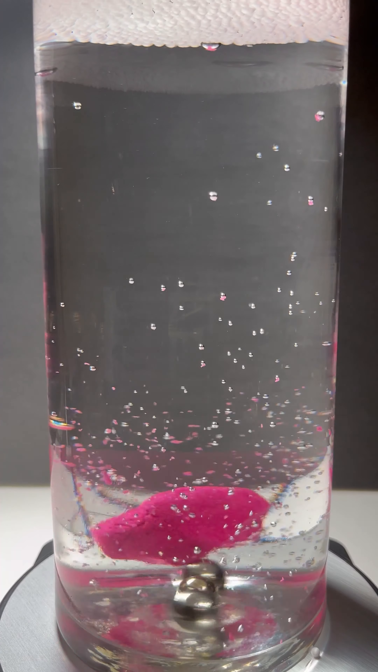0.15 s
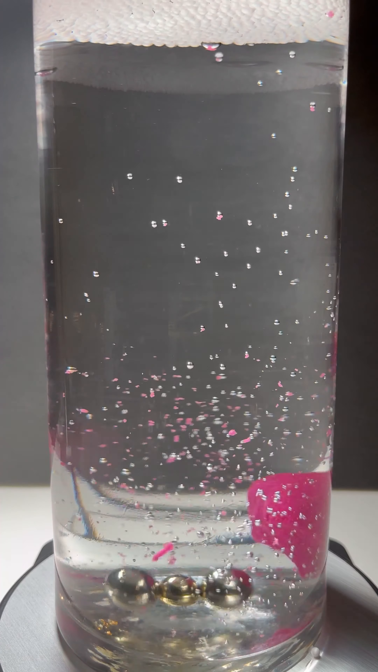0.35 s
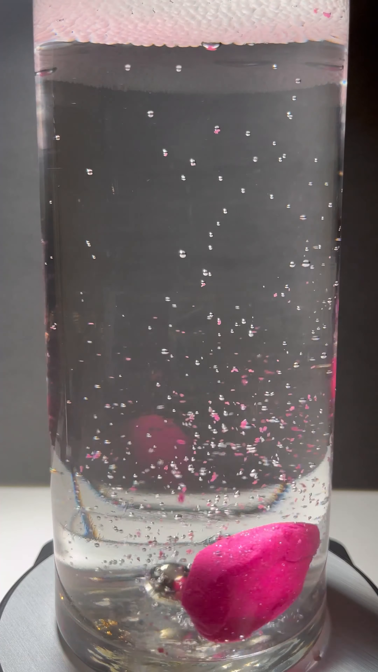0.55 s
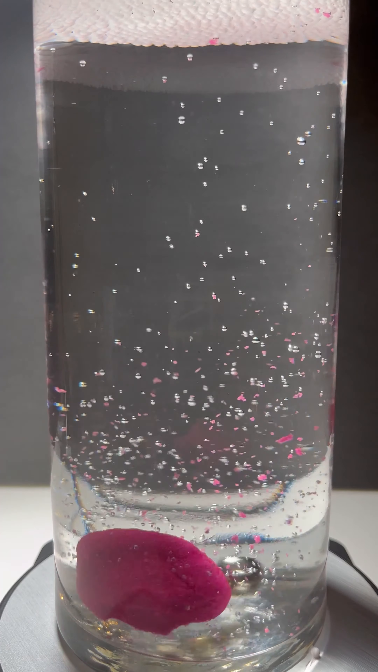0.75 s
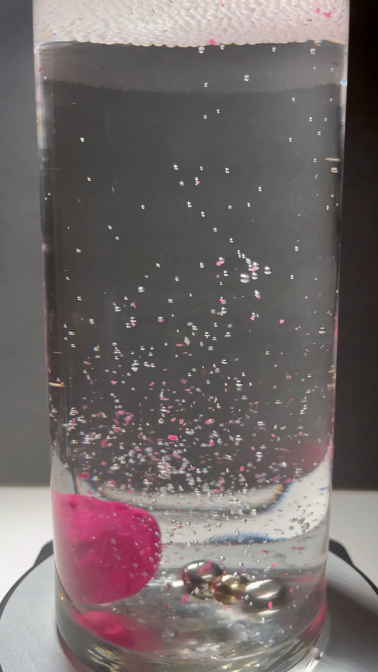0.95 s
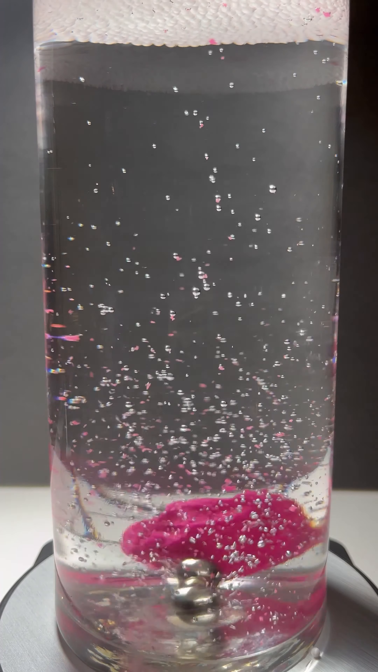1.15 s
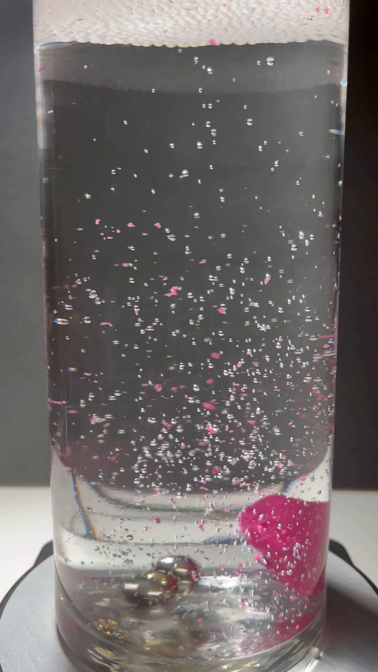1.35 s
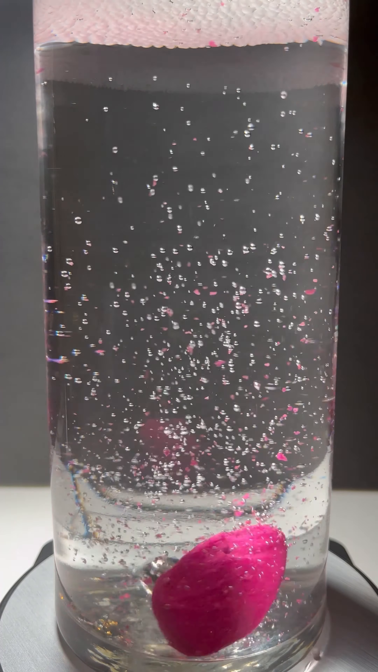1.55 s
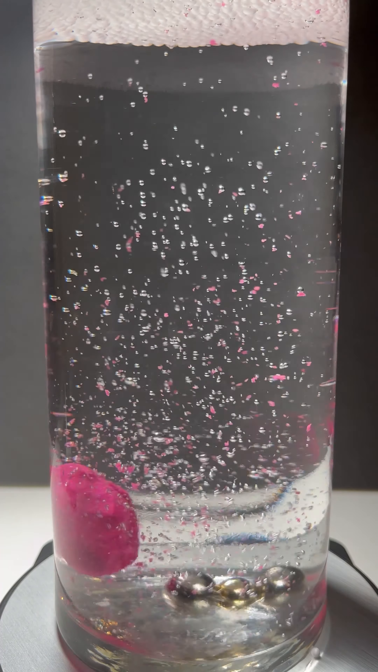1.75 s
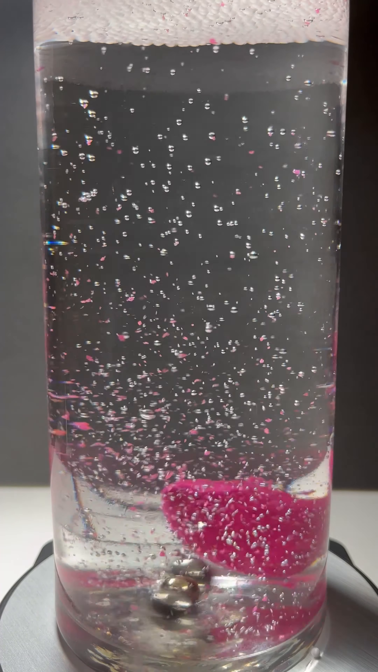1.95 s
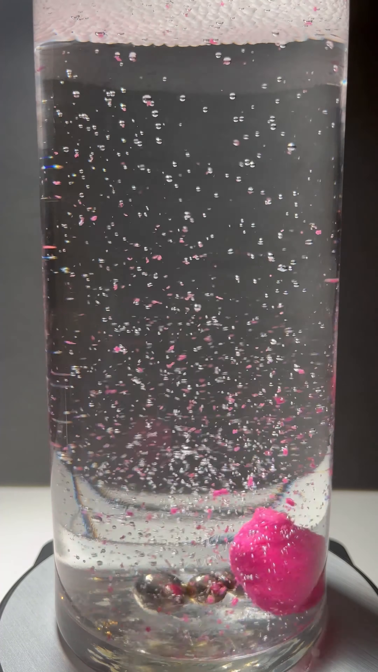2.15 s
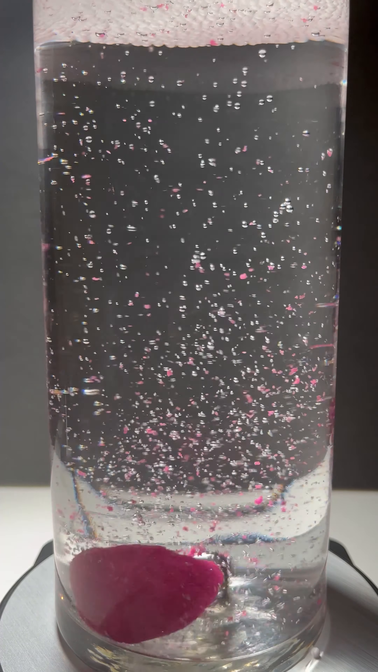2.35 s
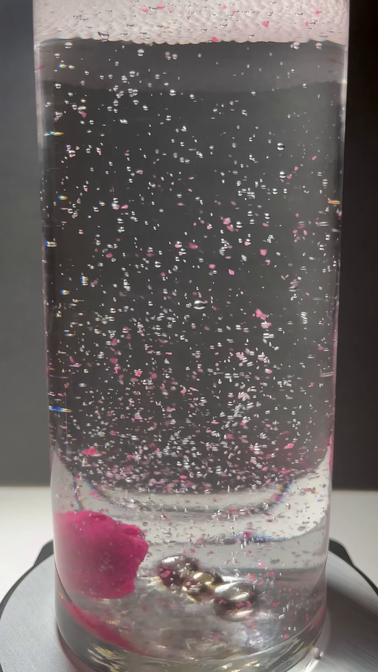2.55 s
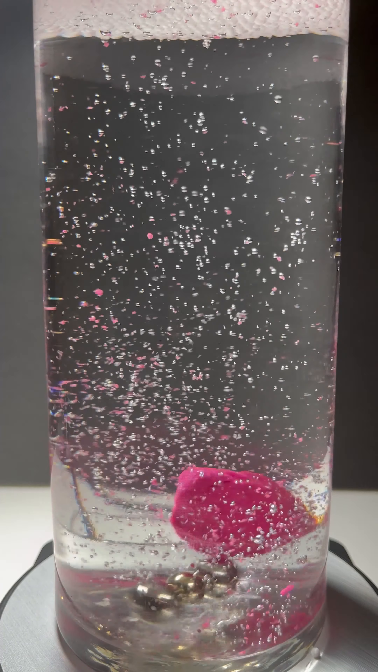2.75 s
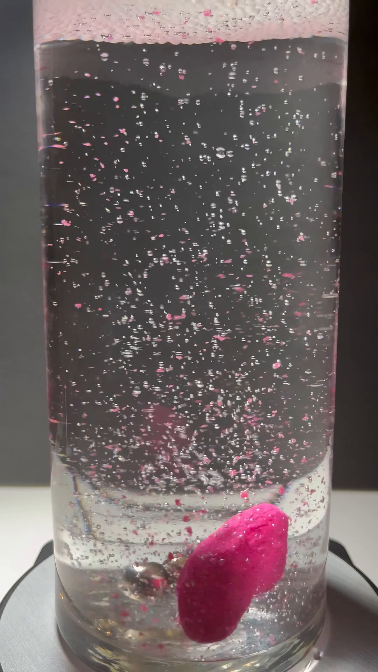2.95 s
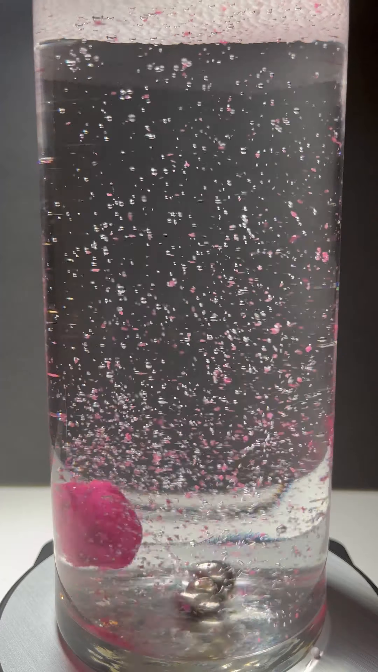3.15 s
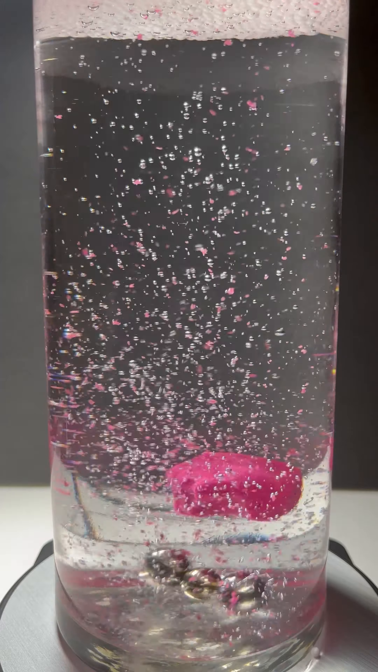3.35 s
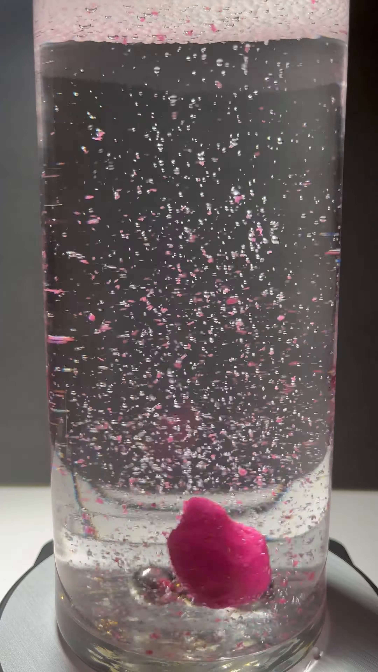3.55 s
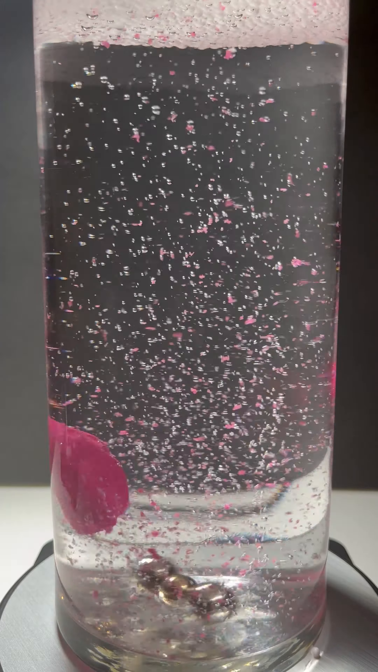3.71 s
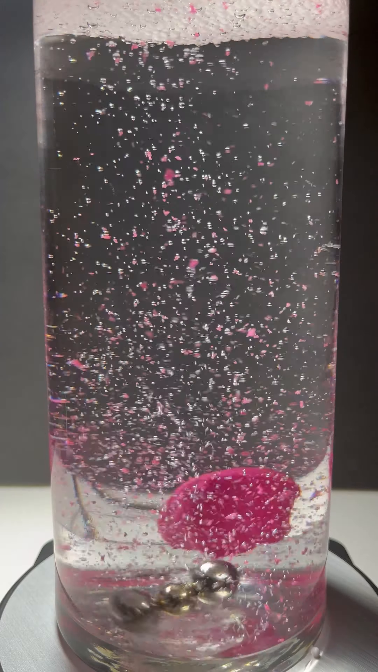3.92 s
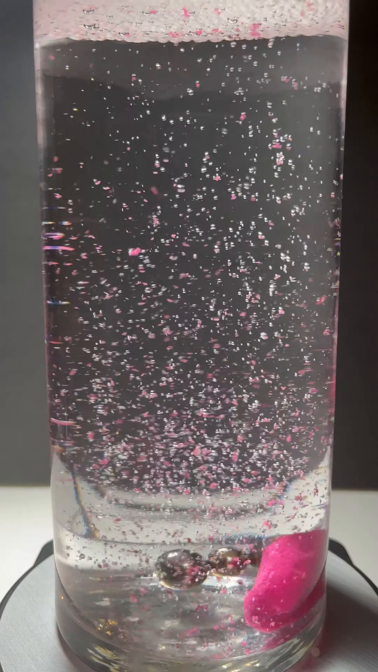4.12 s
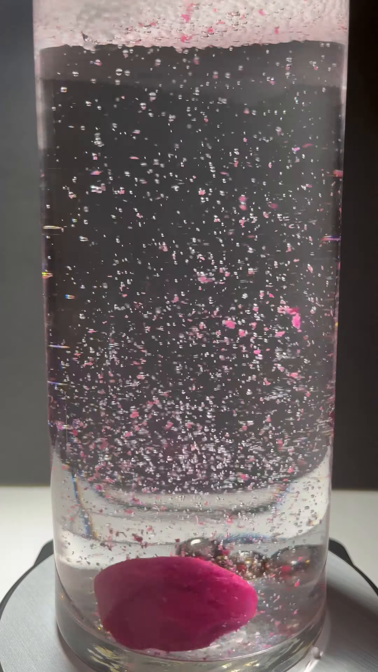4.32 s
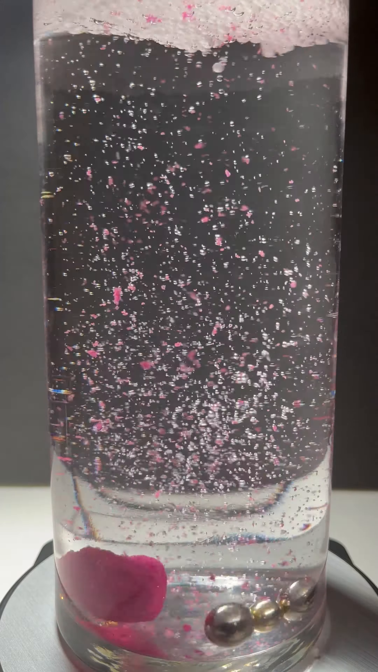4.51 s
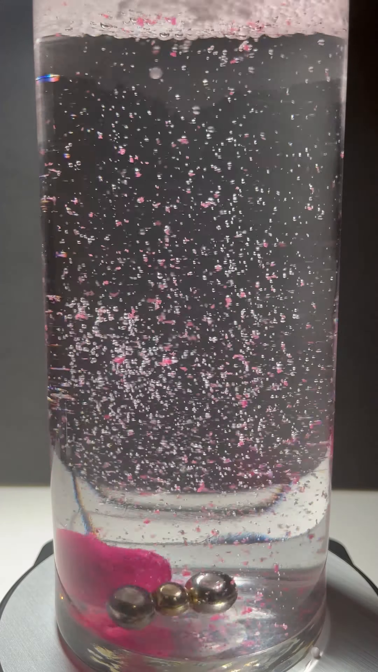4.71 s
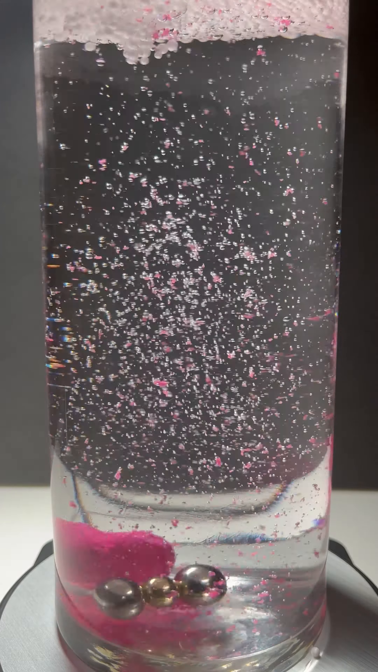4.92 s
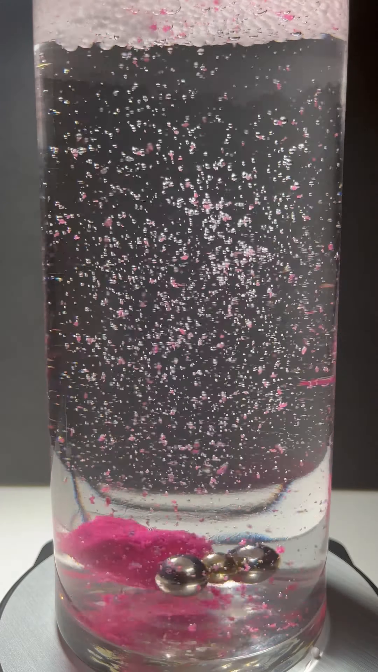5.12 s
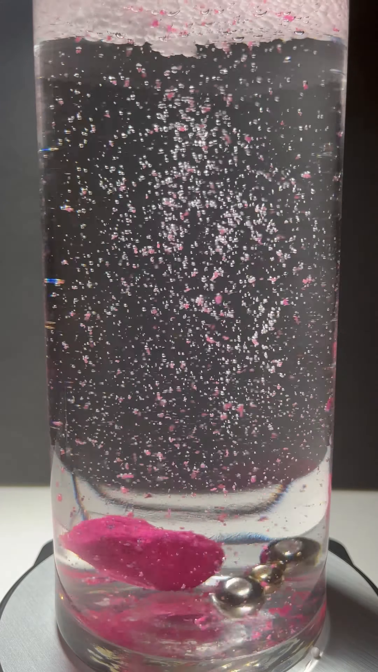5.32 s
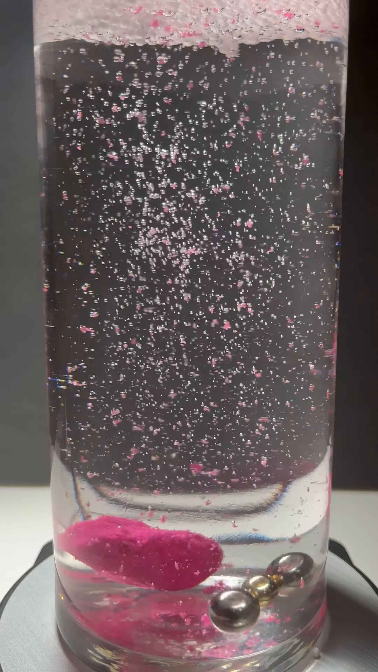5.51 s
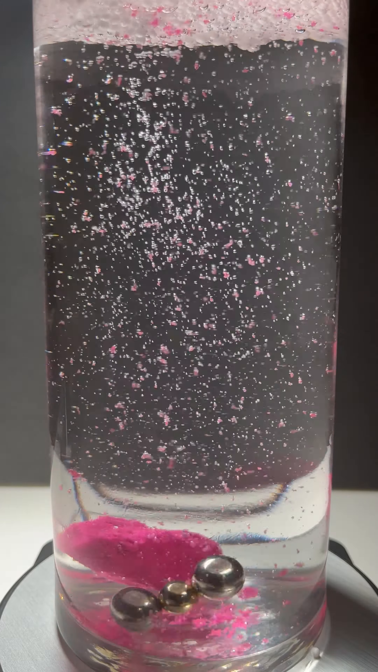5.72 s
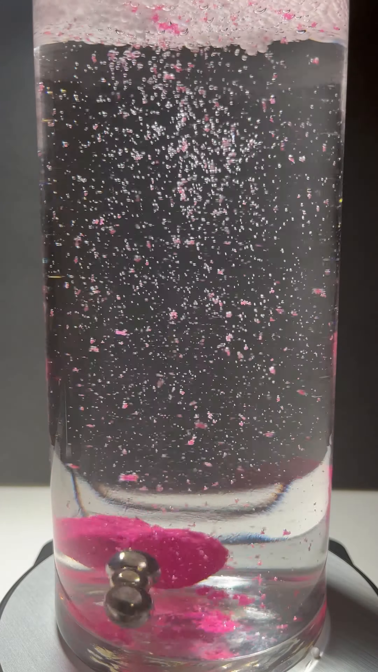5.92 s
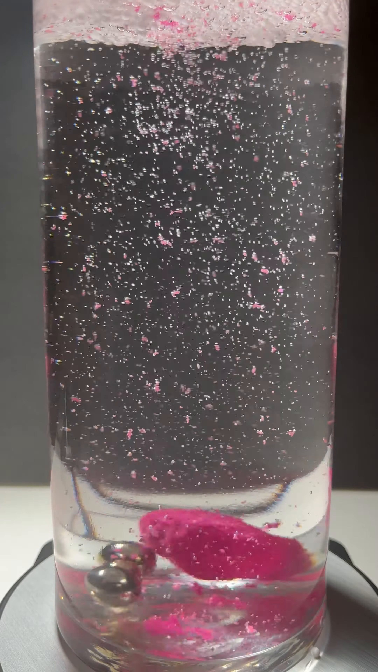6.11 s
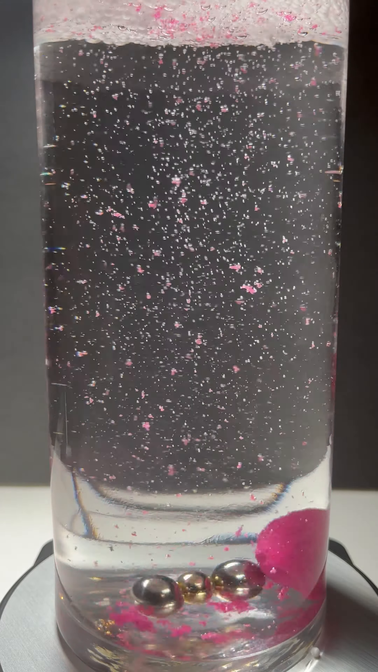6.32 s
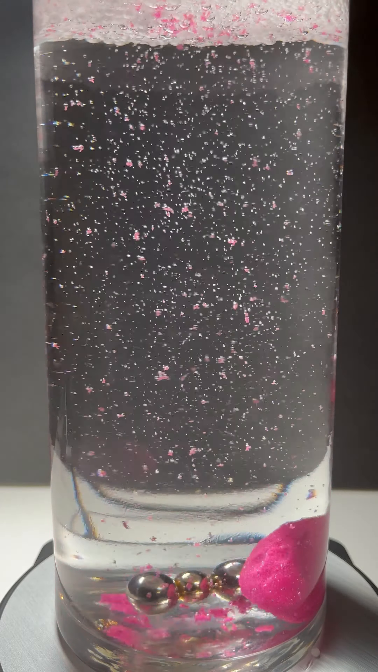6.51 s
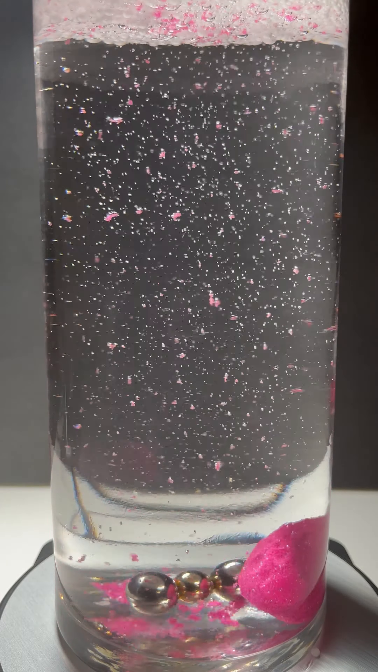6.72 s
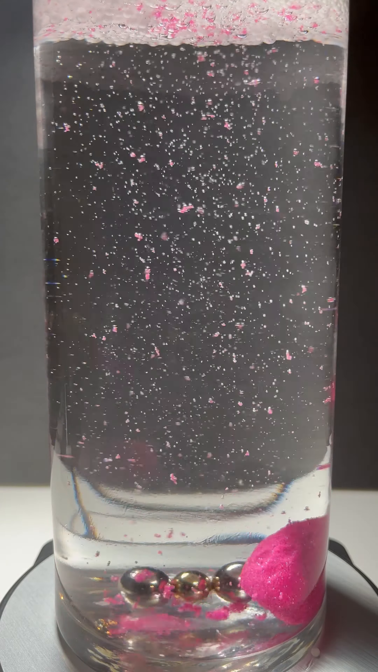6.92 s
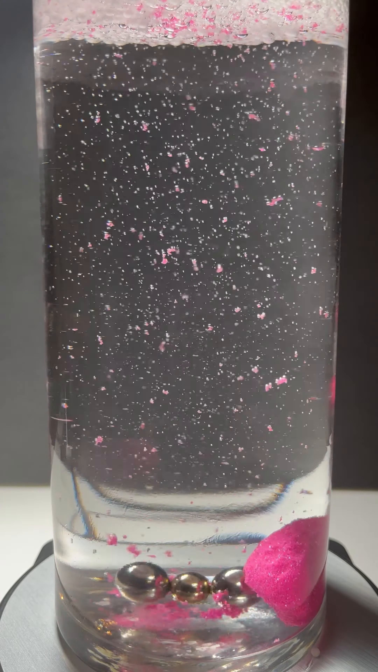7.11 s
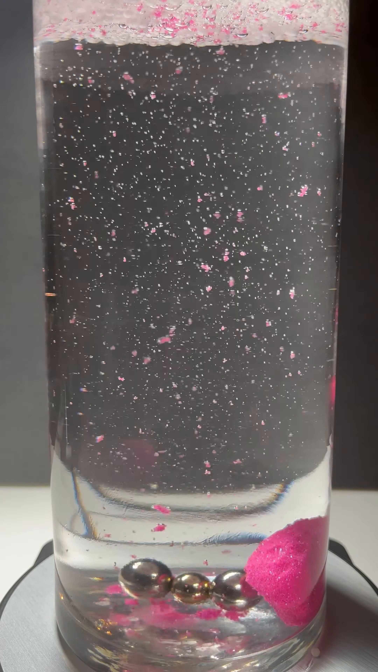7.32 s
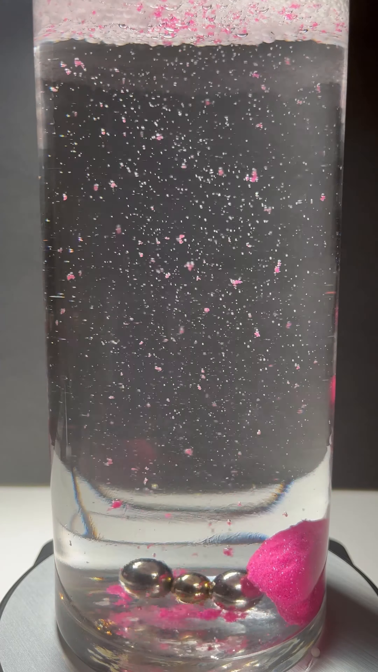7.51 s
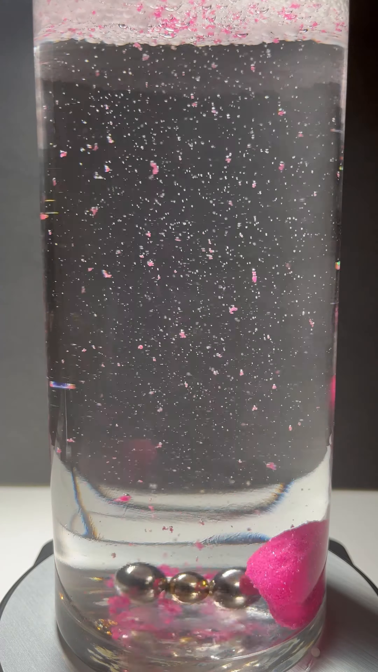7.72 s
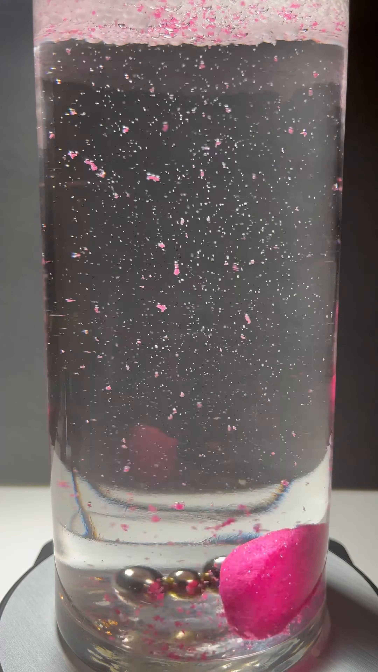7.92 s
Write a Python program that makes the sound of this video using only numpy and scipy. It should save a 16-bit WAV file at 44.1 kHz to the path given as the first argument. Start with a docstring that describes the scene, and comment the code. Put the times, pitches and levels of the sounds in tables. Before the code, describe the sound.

Busy metallic rattling on thick wet glass with dull soft knocks and low rumble, thinning into sharper wall clacks, a quiet humming pause, then a brief restart.

```python
"""A motor hums in a quiet room while it whirls a chain of steel balls round a water-filled glass cylinder.
From the start the balls roll (hails of tiny contacts), the stand rumbles (shaped noise), and hops and landings
click, clack and thud (noise bursts, ringing modes, damped tones); a soft lump knocks dully along with them.
Direct blows on the side wall join midway. After a last cluster of them the balls rest for over a second,
with soft scuffs and few faint taps over the hum, then set off again."""
import sys
import numpy as np
from scipy import signal
from scipy.fft import rfft, irfft, next_fast_len
from scipy.io import wavfile
from scipy.ndimage import uniform_filter1d, map_coordinates

SR = 44100
rng = np.random.default_rng(int(sys.argv[2]) if len(sys.argv) > 2 else 0)


def waveform_to_disk(signal):
    """Save audio, clipped to [-1, 1], as 16-bit WAV at the path in sys.argv[1]."""
    frames = np.transpose(np.atleast_2d(signal))
    scaled = np.clip(frames, -1, 1) * 32767
    samples = np.round(scaled).astype(np.int16)
    wavfile.write(sys.argv[1], SR, samples)


N = 355446
TIME = np.arange(N) / SR
FFT_SIZE = next_fast_len(N + SR // 2, True)
HZ = np.fft.rfftfreq(FFT_SIZE, 1 / SR)


def amp(db):
    """Amplitude factor of a level in dB."""
    return 10 ** (np.asarray(db) / 20)


def unit(x):
    """x scaled to an rms of 1."""
    return x / np.sqrt(np.mean(x ** 2) + 1e-20)


def along(points, hz):
    """Interpolates (freq_hz, value) points on a log frequency axis."""
    f, v = np.transpose(points)
    return np.interp(np.log(hz + 1), np.log(f + 1), v)


def wobble(rate_hz):
    """Smooth random curve through rate_hz random knots a second."""
    knots = rng.standard_normal(int(N * rate_hz / SR) + 4)
    coarse = np.arange(10 * len(knots)) / 10
    return np.interp(TIME * rate_hz, coarse, map_coordinates(knots, [coarse]))


def filtered(x, response):
    """x filtered by a response on the grid HZ."""
    return irfft(rfft(x, FFT_SIZE) * response, FFT_SIZE)[..., :N]


def colour(points):
    """Minimum-phase response of unit power through (freq_hz, level_db) points."""
    cepstrum = irfft(np.log(unit(amp(along(points, HZ)))), FFT_SIZE)
    cepstrum[1:FFT_SIZE // 2] *= 2
    cepstrum[FFT_SIZE // 2 + 1:] = 0
    return np.exp(rfft(cepstrum))


def resonances(rows):
    """Causal response of unit power: steep-skirted (freq_hz, width_hz, level_db) resonances."""
    response = 0
    for freq_hz, width_hz, level_db in rows:
        damping = 1j * HZ * 2 * width_hz
        response = response + amp(level_db) * (damping / (freq_hz * freq_hz - HZ ** 2 + damping)) ** 2
    return response / np.sqrt(np.mean(abs(response) ** 2))


def impulses(times_s, sizes):
    """Train of single-sample pushes."""
    return np.bincount(np.clip(np.round(times_s * SR).astype(int), 0, N - 1), sizes, N)


def dying(pushes, t60_s, rise_s=0.00084):
    """Envelope of a body that takes up each push over rise_s and loses it in t60_s; energies add."""
    fall = np.exp(-2 * np.log(1000) / (t60_s * SR))
    climb = np.exp(-2 / (rise_s * SR))
    energy = signal.lfilter([1 - climb], np.poly([fall, climb]), pushes ** 2 + 1e-30)
    return np.sqrt(np.abs(energy))


# likeness of left and right microphone: freq_hz [Hz], likeness [-1 to 1]
LIKENESS = [(100, 1), (480, 0.87), (750, 0.3), (3000, 0.26), (4700, 0.19), (5800, 0.58), (10000, 0.87),
            (15000, 0.38)]


def shimmer(envelope, response, lag_s=0):
    """Crowded modes as noise under an envelope, at two microphones; the left leads by lag_s."""
    turn = np.arccos(np.clip(along(LIKENESS, HZ), -1, 1)) / 2
    noise = rfft(envelope * rng.standard_normal((2, N)), FFT_SIZE)
    mid, side = noise * response * [np.cos(turn), np.sin(turn)]
    lead = np.exp(1j * np.pi * HZ * lag_s)
    return irfft([(mid + side) * lead, (mid - side) / lead], FFT_SIZE)[:, :N]


def chime(pushes, modes):
    """Each push weights the (freq_hz, level_db, t60_s) modes anew; each microphone has its own phase."""
    where, sound = np.flatnonzero(pushes), np.zeros((2, N))
    for freq_hz, level_db, t60_s in modes:
        drive = np.full(N, 1e-15)
        spot = rng.standard_normal((len(where), 2))
        drive[where] = pushes[where] * amp(level_db + 2.5 * spot[:, 0]) * np.sign(spot[:, 1])
        pole = np.exp((2j * np.pi * freq_hz - np.log(1000) / t60_s) / SR)
        ring = signal.lfilter([1], np.poly([pole, pole.conjugate()]).real, drive) * pole.imag
        sound[0] += ring
        sound[1] += np.roll(ring, int(rng.random() * SR / (np.pi * freq_hz)))
    return sound


def pings(times_s, levels_db, pitches_hz, t60_s, rise_s, lag_s):
    """One damped tone per contact at its own pitch; the right microphone's carrier lags by lag_s."""
    t = np.arange(int(1.4 * t60_s * SR) + 2) / SR
    sound = np.zeros((2, N + SR))
    shape = amp(-60 * t / t60_s) * (1 - np.exp(-t / rise_s))
    for start_s, level_db, pitch_hz in zip(times_s, levels_db, pitches_hz):
        tone = np.sin(2 * np.pi * pitch_hz * (t - [[0], [lag_s]]))
        sound[:, max(round(start_s * SR), 0):][:, :len(t)] += amp(level_db) * shape * tone
    return sound[:, :N]


def roaming(x, depth_db):
    """As the contact point moves round the glass, ever different groups of modes stand out."""
    z = signal.stft(x, nperseg=512)[2]
    field = rng.standard_normal(z.shape[1:])
    for _ in range(2):
        field = uniform_filter1d(field, size=4, axis=0)
        field = uniform_filter1d(field, size=6, axis=1)
    gain = unit(amp(depth_db * np.clip(unit(field), -2, 2)))
    return signal.istft(z * gain, nperseg=512)[1][:, :N]


# motor tones: freq_hz [Hz], level_db [dB rms before wavering]
MOTOR_TONES = [(113, -69.5), (150.7, -70), (263.8, -72.5), (446.8, -73.5)]
# spectrum of the room's hush: freq_hz [Hz], level_db [dB, relative]
HUSH_COLOUR = [(15, -53.5), (25, -20), (130, -9), (197, -15.5), (660, -16), (790, -23), (940, -19),
               (1100, -28), (1410, -18), (1650, -26), (2350, -23.5), (5700, -44), (22000, -75.5)]
HUSH_DB = -61.5


def stirrer():
    """The motor's tones waver in level and phase over the noise of the room."""
    hum = 0
    for freq_hz, level_db in MOTOR_TONES:
        level = amp(level_db + 1.6 * wobble(11.0))
        hum = hum + level * np.sin(2 * np.pi * freq_hz * TIME + 0.39 * wobble(14.0))
    waver_db = 1.5 * wobble(12)
    return np.sqrt(2) * hum + shimmer(amp(HUSH_DB + waver_db), colour(HUSH_COLOUR))


# spells of rolling: start_s [s], end_s [s], hiss_db [dB, relative], drone_db [dB, relative],
# swell_db [dB, midway in the hiss]
ROLLING_SPELLS = [(-0.1, 3.98, -41, -41.5, 2.6), (3.95, 6.25, -51, -53, -1.5),
                  (7.722, 8.1, -44, -42.5, 1.5)]
SPIN_UP_S, RUN_DOWN_S = 0.05, 0.026
DRONE_SWELL = 2.08  # dB of drone swell per dB of hiss swell


def motion():
    """Hiss and drone levels (dB): each spell sets in quickly, swells or sags midway and runs down."""
    hiss, drone = np.full((2, N), 1e-6)
    for start_s, end_s, hiss_db, drone_db, swell_db in ROLLING_SPELLS:
        set_in = np.clip((TIME - start_s) / SPIN_UP_S, 0, 1)
        moving = set_in * np.exp(-np.maximum(TIME - end_s, 0) / RUN_DOWN_S)
        arch_db = swell_db * np.sin(np.pi * np.clip((TIME - start_s) / (end_s - start_s), 0, 1))
        hiss = hiss + moving * amp(hiss_db + arch_db)
        drone = drone + moving * amp(drone_db + DRONE_SWELL * arch_db)
    return 20 * np.log10(hiss), 20 * np.log10(drone)


def rolling(hiss_db, per_second, spread_db):
    """Rolling is a hail of tiny contacts of uneven size whose level wanders a little."""
    happens = rng.random(N) < per_second / SR
    swell_db = 2.8 * np.tanh(.8 * wobble(45))
    sizes = amp(spread_db * np.clip(rng.standard_normal(N), -2, 2))
    return amp(hiss_db + swell_db) * happens * sizes


# landings on the glass bottom: start_s [s], click_db [dB, relative], thud_db [dB, relative]
LANDINGS = [(0.0424, -14, -38), (0.1632, -20, -39), (0.2891, -16.5, -42), (0.4564, -12, -36.5),
            (0.4829, -13, -34), (0.61, -12.5, -42), (0.8144, -17.5, -42), (0.896, -18.5, -50),
            (0.924, -17, -47.5), (1.07, -11.5, -39), (1.1083, -10.5, -32), (1.1829, -11.5, -34.5),
            (1.2234, -11, -28.5), (1.258, -18, -47), (1.281, -21.5, -40), (1.3283, -14, -36.5),
            (1.3687, -13.5, -37), (1.4086, -14, -30.5), (1.4485, -15.5, -38.5), (1.4801, -16.5, -48.5),
            (1.5318, -12.5, -34), (1.5557, -9, -34.5), (1.589, -17.5, -37), (1.6392, -12, -34),
            (1.6604, -13.5, -35.5), (1.699, -11, -38), (1.814, -11, -31), (1.845, -19.5, -51),
            (1.9083, -10, -34.5), (1.9464, -15.5, -37), (1.9767, -16.5, -40), (2.021, -13, -33),
            (2.1, -18.5, -45), (2.216, -15, -41), (2.2559, -13.5, -34.5), (2.28, -12.5, -34.5),
            (2.312, -18, -42),(2.45, -16.5, -44), (2.54, -18, -40), (2.571, -15, -33), (2.6212, -17, -36),
            (2.7259, -17, -34.5), (2.7499, -16, -34), (2.7616, -12.5, -35), (2.8933, -17.5, -35),
            (2.9725, -14, -31.5), (3.027, -13.5, -33.5), (3.067, -12, -33), (3.074, -17.5, -34.5),
            (3.1114, -8, -34.5), (3.138, -13, -37.5), (3.17, -18, -41), (3.2202, -11.5, -35),
            (3.252, -20, -38), (3.3302, -11.5, -31.5), (3.4139, -12, -35.5), (3.492, -17.5, -42),
            (3.559, -19.5, -36), (3.676, -12.5, -36), (3.6955, -15, -38.5), (3.7659, -12.5, -32),
            (3.802, -14, -34.5), (3.8322, -13.5, -39), (3.8758, -17, -39.5), (3.911, -14, -43),
            (3.94, -14, -41.5), (3.972, -15.5, -39), (4.069, -13, -33), (4.122, -15.5, -55),
            (4.2497, -14.5, -35), (4.2952, -20, -38), (4.336, -17, -37), (4.35, -23, -42),
            (4.3848, -21, -38.5), (4.4277, -11, -35.5), (4.771, -16.5, -34), (4.8556, -14, -33.5),
            (4.953, -17.5, -39), (4.98, -20, -38), (4.998, -22.5, -41), (5.0661, -24, -41),
            (5.1148, -15, -37.5), (5.1376, -25, -39), (5.1747, -24, -44), (5.198, -14, -35),
            (5.3023, -27, -47.5), (5.3504, -16.5, -40), (5.3726, -21, -40.5), (5.4227, -12.5, -36.5),
            (5.443, -13.5, -34.5), (5.5104, -13.5, -36.5), (5.6021, -15.5, -35), (5.688, -10.5, -33.5),
            (5.85, -24.5, -45), (6.238, -25, -62), (6.3417, -38.5, -53), (7.325, -58, -60),
            (7.7744, -17.5, -44.5), (7.8216, -21.5, -46), (7.8587, -16, -39), (7.9525, -17, -51),
            (8.0409, -20.5, -40)]
# balls striking the side wall: start_s [s], click_db [dB, relative], clack_db [dB, relative],
# pitch_hz [Hz, mode struck hardest]
SIDE_BLOWS = [(3.455, -18.5, -23.5, 3580), (3.6491, -15, -24, 3340), (4.1252, -26, -17, 3280),
              (4.1847, -15.5, -19, 3080), (4.2183, -22.5, -21, 3210), (4.4669, -21.5, -21.5, 3013),
              (4.4739, -20.5, -19, 3110), (4.5073, -16, -26.5, 2980), (4.514, -16.5, -25.5, 2975),
              (4.568, -18, -23.5, 3700), (4.585, -20, -27, 3350), (4.628, -25, -29.5, 2670),
              (4.647, -12.5, -19.5, 3050), (4.7091, -17.5, -26.5, 2980), (4.7604, -18, -29.5, 3044),
              (4.816, -20, -28, 3280), (4.8758, -18.5, -29.5, 3400), (4.9254, -22, -28.5, 2930),
              (4.9624, -23, -29, 2920), (5.5398, -15.5, -25.5, 2930), (5.5716, -18.5, -21.5, 3070),
              (5.6227, -16.5, -23, 3050), (5.7102, -15, -24, 3010), (5.7787, -19.5, -28.5, 3310),
              (5.7967, -13.5, -18.5, 3067), (5.905, -17.5, -26, 3220), (5.987, -19, -28, 3225),
              (6.0143, -16.5, -20.5, 3150), (6.0515, -16, -22.5, 2990), (6.177, -14.5, -16, 4170),
              (6.1991, -18.5, -22, 3077), (6.213, -20, -23.5, 3120), (7.049, -35.5, -41, 3170),
              (7.7224, -32, -37, 3020)]
CLACK_DB, CLACK_PER_CLICK_DB = -18.5, 0.59  # a landing's clack: dB at a 0 dB click, dB per dB of click
WALL_THUD_DB = -16  # thud relative to the clack


def blows():
    """Landings and wall blows in order of time: rows (start_s, click_db, clack_db, thud_db)."""
    rows = [(s, click, CLACK_DB + CLACK_PER_CLICK_DB * click, thud) for s, click, thud in LANDINGS]
    rows += [(s, click, clack, clack + WALL_THUD_DB) for s, click, clack, _ in SIDE_BLOWS]
    return np.array(sorted(rows))


def airborne(flight_s=0.049, hush_db=12, hard_db=-9):
    """A ball is off the glass just before it lands, so rolling drops (dB), most before hard blows."""
    s, click_db, _, _ = blows().T
    ahead = np.minimum(np.searchsorted(s, TIME), len(s) - 1)
    hardness = np.minimum(amp(click_db - hard_db), 1)[ahead]
    return -hush_db * hardness * np.exp(-((s[ahead] - TIME) / flight_s) ** 2)


HOP_GAP_S, HOP_SPREAD_DB = .035, 3
HOP_CLICK_DB, HOP_CLACK_DB = 14.5, -0.5  # relative to the hiss


def small_hops(hiss_db, count):
    """The chain ticks at uneven gaps, as hard as it rolls: rows (start_s, click_db, clack_db, thud_db)."""
    s = HOP_GAP_S * (np.arange(count) + rng.random(count))
    db = HOP_SPREAD_DB * rng.standard_normal(count) + np.interp(s, TIME, hiss_db)
    clack_db = HOP_CLACK_DB + db
    return np.column_stack([s, HOP_CLICK_DB + db, clack_db, clack_db + WALL_THUD_DB])[s < TIME[-1]]


def contacts(hiss_db):
    """Every blow on the glass: the clear ones, then the small hops."""
    return np.vstack([blows(), small_hops(hiss_db, count=232)])


# broad resonances of the loaded glass bottom: freq_hz [Hz], width_hz [Hz], level_db [dB, relative]
BOTTOM_MODES = [(323, 70, 1.5), (358.2, 21.4, 8.5), (432.3, 33, 10), (553.5, 99, -7)]
# spectrum of the shaking stand: freq_hz [Hz], level_db [dB, relative]
STAND_COLOUR = [(18, -20.5), (38, -9), (52, -11), (76, 4), (92, -3.5), (108, 3.5), (125, -3.5), (148, -4.5),
                (185, -13), (240, -14.5), (500, -70.5)]
# rumble of the stand over time: time_s [s], level_db [dB, relative]
STAND_LEVEL = [(0.0, -43), (1.84, -38), (2.2, -48), (3.18, -34), (3.23, -41.5), (4.12, -41), (4.15, -32),
               (4.26, -40.5), (6.1, -41.5), (6.17, -53.5), (6.21, -33.5), (6.43, -67), (7.71, -60),
               (7.85, -39.5), (8.05, -47)]


def base(hits, drone_db):
    """The bottom drones under the balls and thuds at varying pitch; the stand rumbles below it."""
    rumble_db = np.interp(TIME, *np.transpose(STAND_LEVEL))
    s, _, _, thud_db = hits.T
    bottom = resonances(BOTTOM_MODES)
    waver_db = 3 * wobble(24)
    drone = shimmer(amp(drone_db + waver_db + airborne() - 1.0), bottom)
    thud_hz = 395 * np.exp(.09 * rng.standard_normal(len(s)))
    thuds = pings(s, thud_db + 8, thud_hz, t60_s=.05, rise_s=.004, lag_s=.00007)
    body = amp(26.5) * bottom + amp(24.0) * resonances([(110.0, 26.0, 0)])
    thuds += filtered(impulses(s, amp(thud_db)), body)
    return drone + thuds + shimmer(amp(rumble_db - 2.3), colour(STAND_COLOUR))


# spectrum of a steel click: freq_hz [Hz], level_db [dB, relative]
CLICK_COLOUR = [(500, -39), (3000, -14.5), (5700, -18.5), (6500, 1), (7050, 2.5), (7400, 4.5), (8100, -3),
                (8550, 0.5), (9000, -3), (9450, 3.5), (9850, 5), (10300, -9.5), (16400, -39)]
# spectrum of the bright crack: freq_hz [Hz], level_db [dB, relative]
CRACK_COLOUR = [(8500, -37), (10400, 5.5), (11300, 4.5), (12200, 3), (12850, 5), (13700, 4), (14700, -8.5),
                (15550, 5), (16050, -21), (16600, -16.5)]
# high partials of a steel tick on glass: freq_hz [Hz], level_db [dB, relative], t60_s [s]
TICK_PARTIALS = [(7120, -2, .04), (7400, 0, .04), (7800, -5, .03), (8520, -4, .03), (9380, -2, .04),
                 (12810, -3, .04)]


def steel(hits, grit):
    """Each contact clicks, with a brief glint at its own pitch; rolling fizzes and tinkles."""
    s, click_db, _, _ = hits.T
    lag_s = .000245
    fizz = .8 * dying(grit, t60_s=.017)
    snap = dying(impulses(s, amp(click_db)), t60_s=.021, rise_s=.0005)
    clicks = np.hypot(amp(-2.0) * snap, amp(4.5) * fizz)
    sound = roaming(shimmer(clicks, colour(CLICK_COLOUR), lag_s), depth_db=2.5)
    # the harder the blow, the shorter the contact: cracks grow faster than clicks
    crack = dying(impulses(s, amp(1.36 * click_db - 5.0)), t60_s=0.037, rise_s=0.00029)
    sound += shimmer(np.hypot(crack, amp(-11.5) * fizz), colour(CRACK_COLOUR), lag_s)
    tinkle = chime(amp(-15.5) * grit + impulses(s, amp(click_db - 17)), TICK_PARTIALS)[0]
    sound += filtered(tinkle, np.exp(2j * np.pi * HZ * lag_s * np.array([[0], [-1]])))  # right delayed
    glint_hz = 7000 + 2700 * rng.random(len(s)) ** 2
    return sound + pings(s, click_db - 7, glint_hz, t60_s=.03, rise_s=.0005, lag_s=lag_s)


# spectrum of a wall clack: freq_hz [Hz], level_db [dB, relative]
CLACK_COLOUR = [(250, -39.5), (520, -6.5), (800, -9), (1400, -6), (1680, -14), (1950, -12), (2600, -2.5),
                (3200, 1.5), (3900, -1.5), (4450, -5.5), (4750, 0), (5700, -8.5), (9000, -28)]
# resonances of the glass under a rolling ball: freq_hz [Hz], width_hz [Hz], level_db [dB, relative]
SCRAPE_MODES = [(550, 58, -2.5), (789, 33, 1.5), (942, 40, 0.5), (1087, 66, -1), (1311, 96, 2.5),
                (1915, 141, 0), (2570, 140, 0), (3160, 179, 6), (3637, 240, 6.5), (3902, 200, 1.5),
                (4400, 210, 1), (4716, 280, -1)]
# modes of the water-filled cylinder: freq_hz [Hz], level_db [dB, relative], t60_s [s]
CYLINDER_MODES = [(2540, -14, .09), (2724, -17.5, .24), (2930, -11, .07), (3085, -9, .17), (3225, -9, .14),
                  (3338, -13, .11), (3560, -11, .09), (3850, -12, .09), (4160, -10, .12), (4436, -17, .1),
                  (4780, -13, .07), (5001, -16, .1)]
# its lowest, bell-like tones: freq_hz [Hz], level_db [dB, relative], t60_s [s]
BELL_MODES = [(1402, -38, .62), (2040, -47, .52)]


def wall(hits, grit):
    """The water-damped wall gives a short clack and rings in its modes; rolling scrapes it."""
    s, _, clack_db, _ = hits.T
    clacks = dying(impulses(s, amp(clack_db)), t60_s=0.026, rise_s=0.0008)
    sound = shimmer(amp(3.5) * clacks, colour(CLACK_COLOUR), lag_s=.00008)
    scrape = np.hypot(amp(-5.0) * dying(grit, t60_s=0.045), amp(-7) * clacks)
    sound += shimmer(scrape, resonances(SCRAPE_MODES), lag_s=.00004)
    sound = roaming(sound, depth_db=2.2)
    # hard blows wake the cylinder's modes far more than soft ones
    sound += chime(impulses(s, amp(1.44 * clack_db + 3)) + amp(-28) * grit, CYLINDER_MODES)
    # only direct blows wake the bell tones, and one mode most of all, depending on the spot struck
    s, _, clack_db, pitch_hz = np.transpose(SIDE_BLOWS)
    bell_push = amp(.5 * clack_db) * np.minimum(amp(clack_db + 26), 1)
    sound += chime(impulses(s, bell_push), BELL_MODES)
    return sound + pings(s, clack_db + 3, pitch_hz, t60_s=.045, rise_s=.0012, lag_s=.00007)


# the soft lump meets the glass: start_s [s], level_db [dB, relative]
LUMP_KNOCKS = [(0.202, -22.5), (0.301, -25.5), (0.405, -26), (1.229, -25.5), (1.449, -22.5), (1.561, -24),
               (1.656, -27.5), (2.103, -25), (2.156, -24), (2.62, -30), (2.978, -19.5), (3.14, -28),
               (3.555, -28.5), (3.976, -21.5)]


def lump():
    """The soft lump's pushes excite two low resonances: dull knocks with no treble."""
    s, level_db = np.transpose(LUMP_KNOCKS)
    body = resonances([(181.3, 39, 7.9), (292.0, 42.0, 13.7)])
    return amp(20.0) * filtered(impulses(s, amp(level_db)), body)


# soft scuffs while the balls rest: centre_s [s], level_db [dB, relative]
REST_SCUFFS = [(6.453, -51), (7.026, -56.5), (7.12, -53.5)]


def scuffs():
    """Brief dull rubs of noise swell and fade."""
    swell = sum(amp(level_db) * np.exp(-((TIME - s) / 0.0154) ** 2) for s, level_db in REST_SCUFFS)
    dull = [(60, 0.0), (150, 0.5), (600, 4.0), (1200, 5), (2000, -8), (5000, -17), (12000, -39)]
    return shimmer(swell, colour(dull))


# decay of the room: freq_hz [Hz], t60_s [s]
ROOM_DECAY = [(100, 0.16), (700, 0.21), (3000, 0.094), (7000, 0.022), (15000, 0.028)]


def room(x):
    """Reverberation of a small room: decaying noise whose treble dies soonest."""
    hz, t, z = signal.stft(rng.standard_normal((2, SR // 2)), SR, nperseg=256)
    decay = amp(-60 * t / along(ROOM_DECAY, hz)[:, None])
    tail = signal.istft(z * decay, SR, nperseg=256)[1]
    tail = tail * (1 - np.exp(-TIME[:tail.shape[1]] / 0.0011))
    return signal.fftconvolve(x, tail / np.linalg.norm(tail[0]), axes=1)[:, :N]


def scene():
    """The same blows and motion drive the steel, wall and bottom of the cylinder, in a small room."""
    hiss_db, drone_db = motion()
    hiss_db = hiss_db + airborne()
    hits = contacts(hiss_db)
    grit = rolling(hiss_db, per_second=1900, spread_db=1.5)
    rattle = steel(hits, grit) + wall(hits, grit)
    knocks = base(hits, drone_db) + lump() + scuffs()
    echo = room(amp(-8.5) * rattle + amp(-16.5) * knocks)
    return rattle + knocks + echo + stirrer()


TOP_HZ = 16600


def record(dry):
    """A steep low-pass limits the band at TOP_HZ."""
    return filtered(dry, 1 / (1 + (HZ / TOP_HZ) ** 160))


dry = scene()
out = record(dry)
waveform_to_disk(out)
```